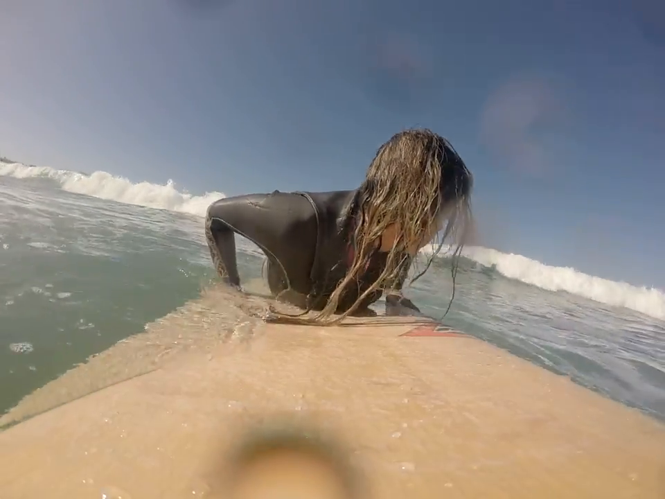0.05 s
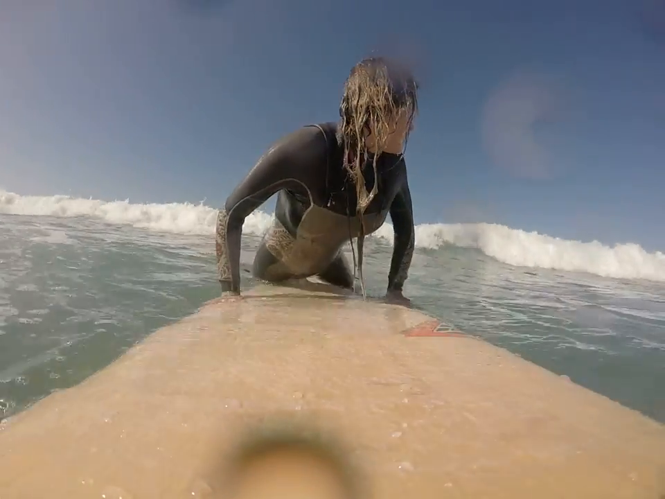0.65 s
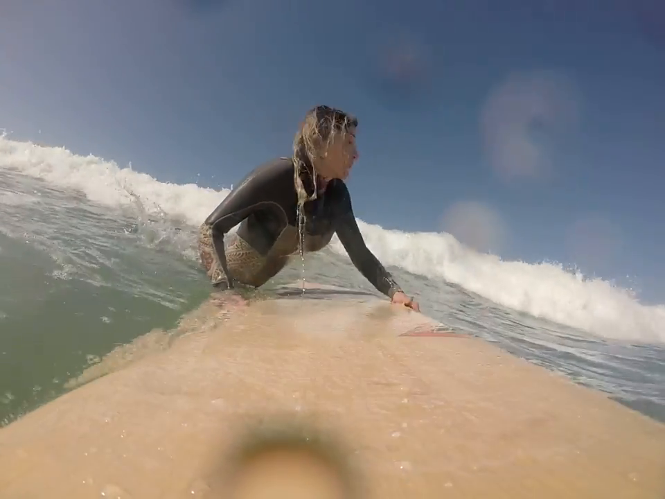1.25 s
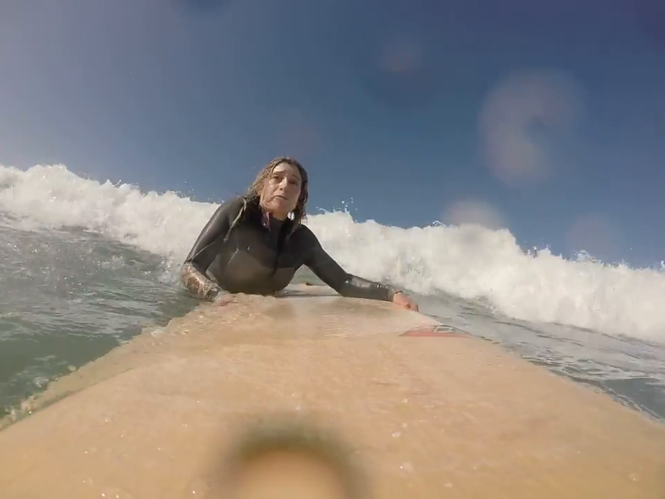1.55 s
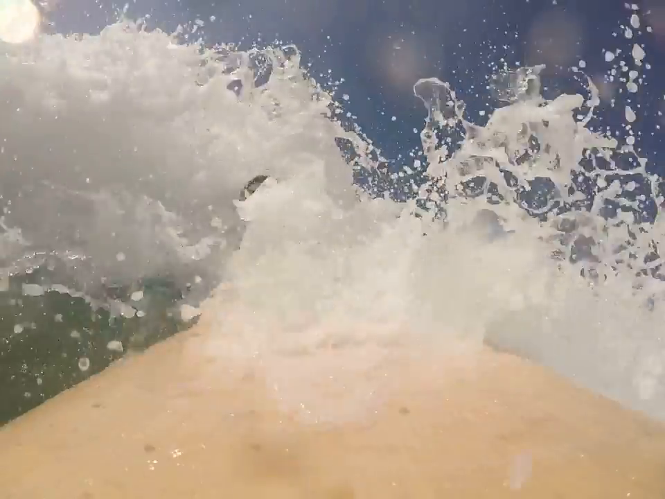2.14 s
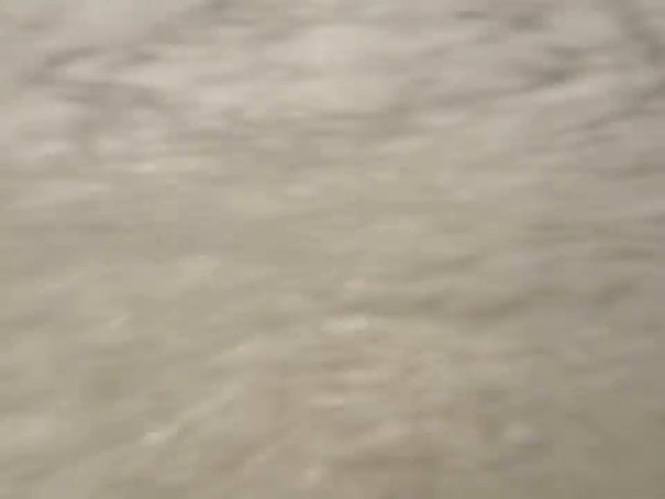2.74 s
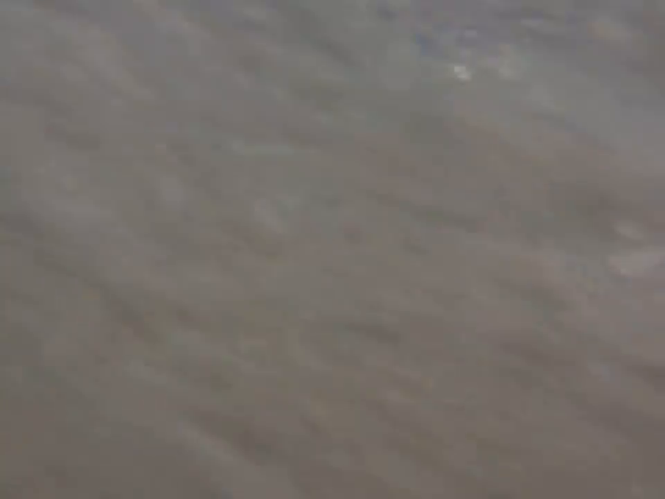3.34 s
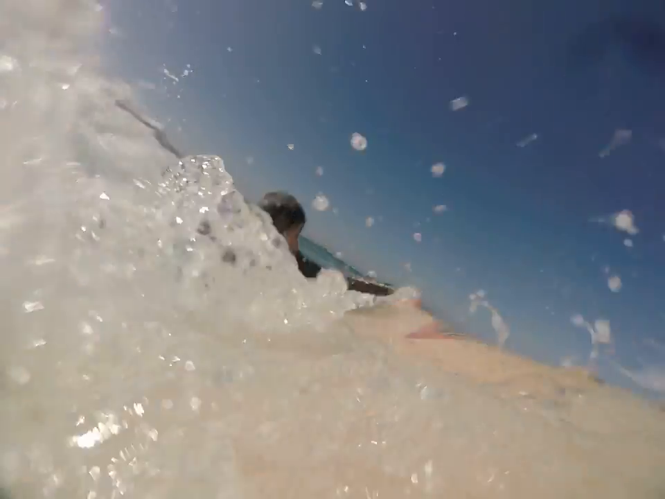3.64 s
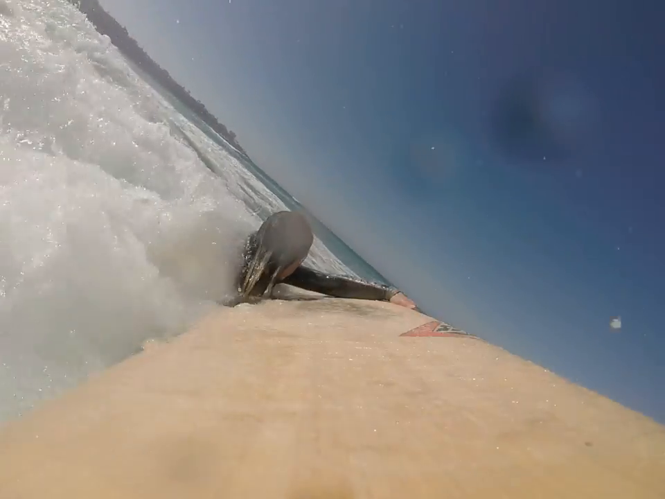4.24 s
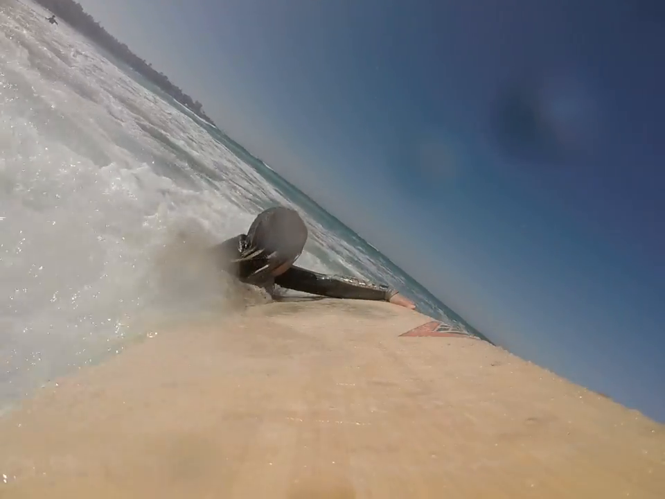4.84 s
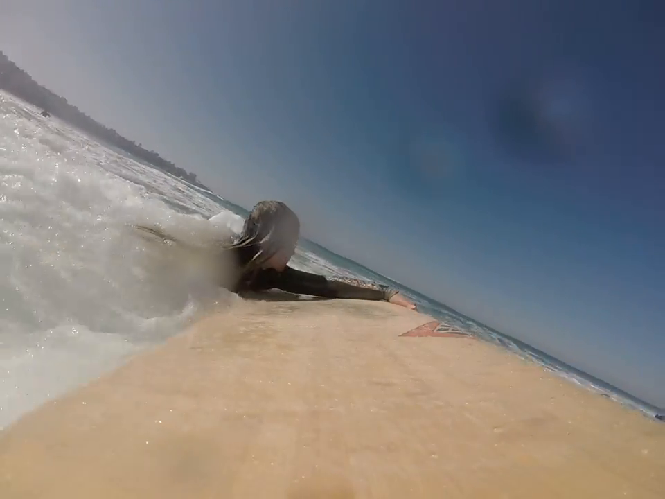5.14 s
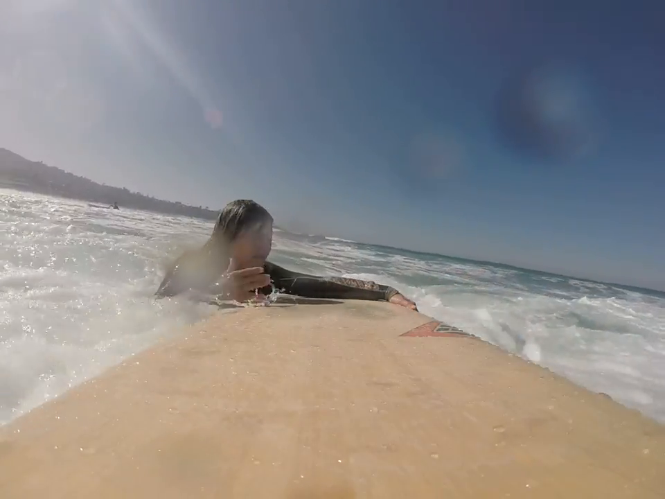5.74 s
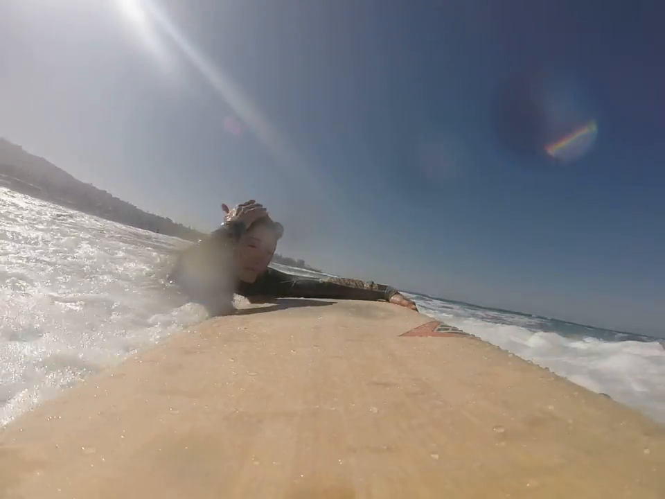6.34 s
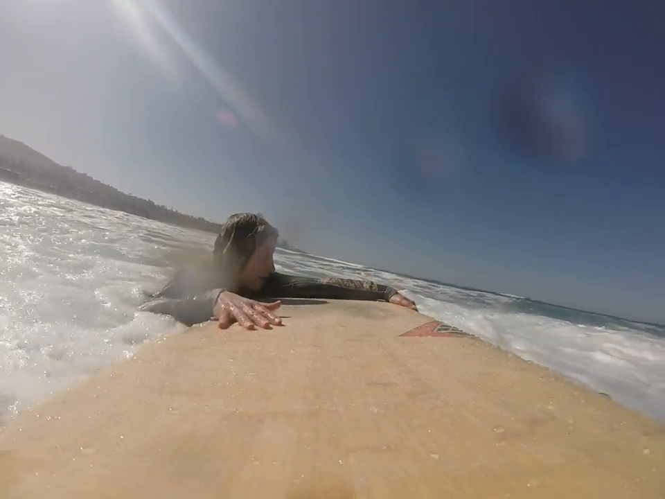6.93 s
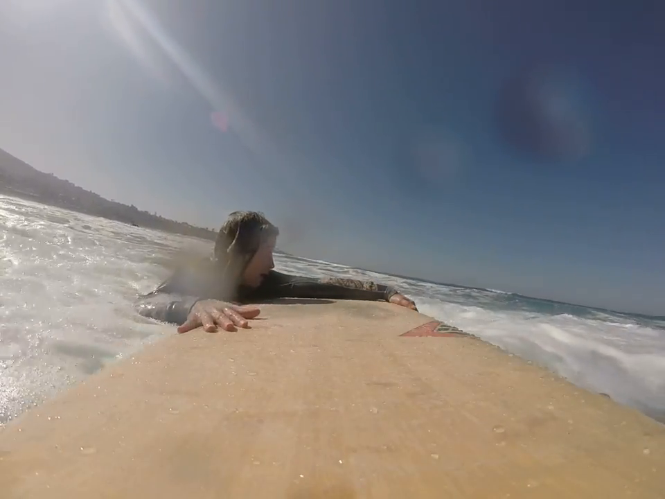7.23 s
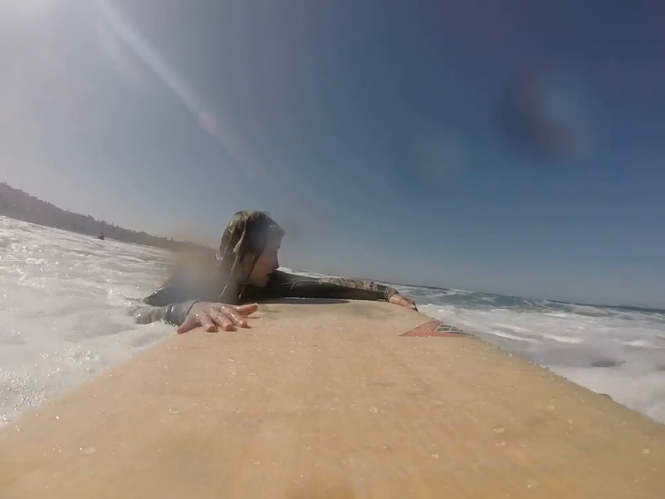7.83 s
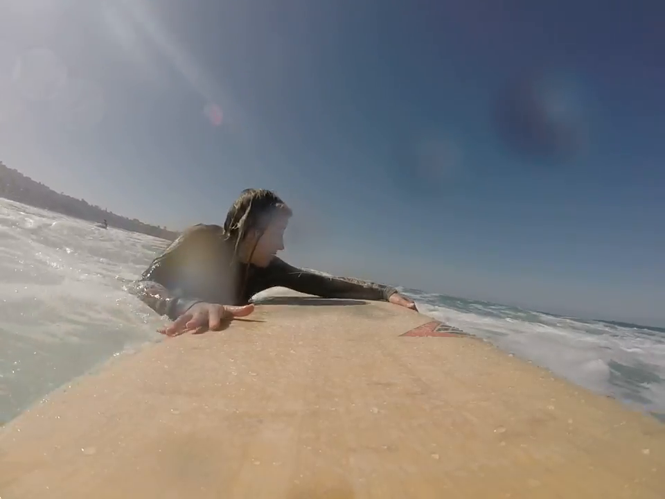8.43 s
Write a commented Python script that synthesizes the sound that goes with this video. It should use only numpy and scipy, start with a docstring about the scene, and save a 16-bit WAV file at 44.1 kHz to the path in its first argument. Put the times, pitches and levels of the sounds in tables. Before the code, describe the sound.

Surf roars in and buries a board in spray and low rumble, drains off with a glug, and leaves water slopping softly.

```python
"""A surfboard meets a breaking wave

Heard through a waterproof case on the board's nose, surf roars closer, whitewater buries the case
in ringing bubbles and drains away, then foam fizzes and slops around. The hollow board booms in its
bending mode under eddies and knocks. Slaps and drops ring the case, and wet hands squeak on the
deck by stick-slip friction."""
import sys
import numpy as np
from scipy import signal
from scipy.fft import rfft, irfft, next_fast_len
from scipy.io import wavfile

SR = 44100
rng = np.random.default_rng(int(sys.argv[2]) if len(sys.argv) > 2 else 0)


def dump_mix(stems):
    """Bounce the given channels to the path in sys.argv[1] as a 16-bit WAV at rate SR."""
    frames = np.atleast_2d(stems).T  # one column per channel
    limited = np.clip(frames, -1, 1)  # hard clip at full scale
    pcm = np.round(limited * 32767).astype(np.int16)
    wavfile.write(sys.argv[1], SR, pcm)


N = 378378
TIME = np.arange(N) / SR
WAVE_HITS_S, DRAINED_S = 2.329, 3.83


# Spectra of froth and of spray. Each row: frequency in Hz, relative density in dB.
FROTH_SPECTRUM = [(550, -12.5), (900, -9), (1400, 0), (2400, 2.5), (3200, -0.5), (4200, -5.5),
                  (5500, -13.5)]
SPRAY_SPECTRUM = [(3200, 9.5), (4200, -1.5), (5500, 3), (8500, -2), (11000, -7.5), (13500, -11.5),
                  (15300, -22)]
# The sheet of water breaks into drops. Each row: time in seconds, share of the full bubble rate.
WATER_COVER = [(2.33, 0.98), (2.85, 0.76), (3.05, 0.42), (3.25, 0.25), (3.42, .42), (3.7, 0.32)]

def whitewater(froth_db=-1.0, spray_db=0.5, rush_db=-9, mist_db=-13, clump_db=2.0):
    """Bubbles and spray on the case superpose into a rush, which parts into drops as their rate falls."""
    froth_gain, spray_gain = dousing()
    share, = in_time(WATER_COVER)
    froth = bubbles(FROTH_SPECTRUM, per_s=2400, cycles=15, spread_db=1.5, sizes=14, share=share)
    froth += from_db(rush_db) * noise(FROTH_SPECTRUM)
    spray = bubbles(SPRAY_SPECTRUM, per_s=4600, cycles=12, spread_db=2.5, sizes=14, share=share)
    spray += from_db(mist_db) * noise(SPRAY_SPECTRUM)
    spray *= np.interp(TIME, [3.62, 3.73], [1, 0])   # the spray stops as the case surfaces
    water = from_db(froth_db) * froth_gain * froth + from_db(spray_db) * spray_gain * spray
    return from_db(clump_db * drift(90)) * water


# Sheets of whitewater land on the case. Each row: start and length in seconds, relative levels of
# froth and of spray in dB.
WATER_SHEETS = [(2.323, 0.018, -14.5, -21.5), (2.397, 0.087, -17.5, -27), (2.563, 0.29, -18.5, -31.5),
                (2.875, 0.14, -23.5, -29), (3.018, 0.066, -27, -26), (3.105, 0.19, -36, -32),
                (3.341, 0.016, -22.5, -31), (3.401, 0.055, -21.5, -34), (3.487, .17, -27, -42.5)]

def dousing(attack_s=0.0085, run_off_db_per_s=167):
    """Gains of froth and spray: sheets pour, run off exponentially and, being incoherent, add in power."""
    froth, spray = 0, 0
    for start, length, froth_db, spray_db in WATER_SHEETS:
        landing = np.clip((TIME - start) / attack_s, 0, 1)
        pour = landing * from_db(-run_off_db_per_s * np.maximum(TIME - start - length, 0))
        froth = np.hypot(froth, from_db(froth_db) * pour)
        spray = np.hypot(spray, from_db(spray_db) * pour)
    return froth, spray


# Spectra of roar and of foam hiss. Each row: frequency in Hz, relative density in dB.
ROAR_SPECTRUM = [(500, -9.5), (880, -16.5), (1020, -11.5), (1150, -4), (1420, -1), (1800, -4.5), (2050, -2),
                 (2350, 3.5), (2650, -4.5), (3000, -5.5), (3500, -14.5), (4500, -25.5), (7000, -70)]
HISS_SPECTRUM = [(2500, -19), (3800, 4.5), (4600, -1.5), (5300, -1.5), (6400, -6.5), (7700, -7),
                 (9000, -14), (11000, -15), (13500, -19), (15500, -32)]
# The surf nears, breaks and settles. Each row: time in seconds, relative levels of roar and hiss in dB.
SURF_LEVELS = [(0.0, -35, -55), (0.9, -31.5, -53.5), (1.3, -29.5, -47.5), (1.76, -28, -44.5),
               (1.94, -17, -40.5), (2.3, -21, -42), (2.55, -31.5, -34), (3.65, -34.5, -54),
               (3.88, -45, -64), (4.3, -35.5, -52.5), (4.8, -34, -51), (5.4, -40, -53.5), (5.6, -37.5, -58),
               (6.35, -41.5, -57), (7.0, -37.5, -56.5), (7.4, -42, -59), (8.58, -40.5, -58)]

def surf(pops_db=-4.5, fizz_db=-9.0, slop_hiss_db=-22, surge_db=1.5):
    """Far bubbles sum to noise, near ones pop and fizz; the case wall transmits mostly 1-3 kHz."""
    roar_db, hiss_db = in_time(SURF_LEVELS)
    _, foam = slopping()
    in_foam = np.interp(TIME, [1.5, 4.0, 5.8, 7.0], [0.64, 1.3, 1.14, 0.32])   # arrives, then settles
    pops = from_db(pops_db) * bubbles(ROAR_SPECTRUM, per_s=550, cycles=15.6, spread_db=4.0, sizes=16)
    fizz = from_db(fizz_db) * bubbles(SPRAY_SPECTRUM, per_s=63, cycles=15, spread_db=3.5, sizes=7)
    roar = noise(ROAR_SPECTRUM) + in_foam * pops
    hiss = noise(HISS_SPECTRUM) + in_foam * fizz
    roar *= np.hypot(from_db(roar_db), foam)
    hiss *= np.hypot(from_db(hiss_db), from_db(slop_hiss_db) * foam)
    return (roar + hiss) * from_db(surge_db * drift(30))


# The water's steady push on the hull. Each row: time in seconds, relative level in dB.
HULL_PUSH = [(0.0, -43), (1.2, -41.5), (1.75, -41), (1.95, -20), (2.25, -20), (2.55, -29), (2.85, -29),
             (3.15, -33.5), (3.9, -39.5), (5.0, -38.5), (6.3, -42.5), (8.58, -44)]
# Spectra of sloshing, the flooded deck's filter, the buffeted board and large eddies.
# Each row: frequency in Hz, relative level in dB.
SLOSH_SPECTRUM = [(110, -7), (170, -3), (220, -1), (285, 0.5), (370, -2), (470, -5.5), (600, -12.5),
                  (850, -12.5), (1300, -3)]
FLOODED_RESPONSE = [(100, 2.5), (230, -0.5), (290, 2.5), (380, -9.5), (600, -8), (1300, -4.5)]
BUFFET_SPECTRUM = [(15, -15), (35, -11), (55, -8), (72, -2), (86, 7.5), (98, 2.5), (120, -16.5), (200, -38)]
CHURN_SPECTRUM = [(18, -1), (35, -5), (60, 3)]

def hull(slosh_db=-4.5, gurgle_db=-3.0, run_off_db=-23, lump_db=2.0, eddy_db=3.0):
    """Forced vibration: one flow rings air pockets at the rails and shakes the board's bending mode."""
    push = np.hypot(from_db(in_time(HULL_PUSH)[0]), slopping()[0])
    run_off = from_db(run_off_db) * swell(3.635, 0.15)   # the deck sheds its water in one gush
    slosh_gain = np.hypot(from_db(slosh_db) * push, run_off)
    pockets = bubbles(SLOSH_SPECTRUM, per_s=450, cycles=10.2, spread_db=4.0, sizes=11)
    water = unit_rms(noise(SLOSH_SPECTRUM) + from_db(gurgle_db) * pockets)
    flooded = np.interp(TIME, [2.6, 2.95, 3.6, 3.8], [0, 1, 1, 0])   # the deck sounds lower and hollower
    water = (1 - flooded) * water + flooded * colour(water, FLOODED_RESPONSE)
    churn_db = np.interp(TIME, [3.4, 3.8, 5.8, 6.1], [-4.5, -4.5, 1, -13])   # big eddies trail the wave
    shake = noise(BUFFET_SPECTRUM) + from_db(churn_db) * noise(CHURN_SPECTRUM)
    slosh = slosh_gain * from_db(lump_db * drift(25)) * water
    return slosh + push * from_db(eddy_db * drift(17)) * shake


# Small waves slop against the board. Each row: middle and length in seconds, relative levels of
# push and of foam in dB.
SMALL_WAVES = [(0.047, .14, -30.5, -33.5), (0.46, 0.13, -36.5, -40), (1.408, 0.18, -29, -51),
               (1.973, 0.083, -17.5, -33), (3.577, 0.31, -26.5, -33), (4.189, 0.16, -37.5, -34),
               (4.416, 0.24, -37.5, -41), (4.68, 0.4, -32.5, -42), (5.06, 0.17, -29.5, -29.5),
               (5.343, 0.18, -37.5, -36.5), (5.498, .12, -32.5, -60), (5.737, 0.18, -41.5, -40.5),
               (6.117, 0.18, -34.5, -41), (8.502, 0.13, -33, -34)]

def slopping():
    """Amplitude envelopes of the push on the hull and the stirred foam, as each wave swells and ebbs."""
    push, foam = 0, 0
    for middle, length, push_db, foam_db in SMALL_WAVES:
        shape = swell(middle, length)
        push += from_db(push_db) * shape
        foam += from_db(foam_db) * shape
    return push, foam


# Water and body strike the board. Each row: start in seconds, relative level of the boom in dB,
# thud in dB relative to the boom.
BOARD_BLOWS = [(0.057, -20, -6), (1.689, -19.5, 12.5), (1.719, -14, -5), (1.97, -4.5, -9),
               (2.218, -1.5, -18), (2.349, -6.5, -2), (2.482, -11.5, 2.5), (2.827, -10, -9),
               (3.588, -15, 2), (4.398, -17.5, -8), (5.067, -21, -9.5), (5.475, -22.5, -2),
               (6.763, -12, -13), (7.549, -21.5, -2), (7.864, -6, -3)]

def knocks(level_db=-3.0, push_s=0.005, boom_hz=87.7, thud_hz=200):
    """Free vibration: after a soft push the bending mode booms on, while a higher mode dies at once."""
    out, t = np.zeros(N), TIME[:SR // 2]
    push = np.diff(t ** 2 * np.exp(-2 * t / push_s), prepend=0)
    boom = unit_peak(ring(push, boom_hz, t60_s=0.31))
    thud = unit_peak(ring(np.diff(push, prepend=0), thud_hz, t60_s=0.02))
    for start, db, thud_db in BOARD_BLOWS:
        add(out, start, from_db(db + level_db) * (boom + from_db(thud_db) * thud))
    return out


# Hard slaps of water. Each row: start in seconds, peak in dB, pitch in Hz, spatter decay in seconds.
WATER_SLAPS = [(0.06, -14, 1240, 0.0035), (0.083, -13, 1320, .0026), (0.107, -10, 1440, 0.0031),
               (0.467, -15, 2200, 0.0039), (0.842, -13.5, 1800, .004), (1.321, -19, 316, .005),
               (1.324, -12.5, 1970, .0055), (1.556, -8, 2050, 0.0032), (1.671, -11, 2190, .004),
               (2.124, -5, 2190, 0.0019), (2.341, -10, 3360, 0.048), (2.486, 1, 3100, 0.0046),
               (2.709, -5.5, 2130, 0.0028), (2.759, -5, 3150, .0036), (2.813, -14, 700, 0.0036),
               (2.898, -3, 4150, 0.0028), (3.006, -9.5, 1505, .005), (3.040, 0.5, 2880, .0008),
               (3.330, 0.5, 2050, 0.0029), (3.363, -4, 4100, 0.0031), (3.400, -5, 2020, .004),
               (3.438, -10, 4960, .0025), (3.537, -3, 1980, 0.0019), (3.556, -9, 2290, .0027),
               (3.577, -5.5, 1500, 0.0022), (3.599, -3, 1430, 0.00092), (3.677, -9, 2150, 0.012),
               (3.736, -14, 1100, .002), (4.149, -24.5, 540, .003), (4.686, -18.5, 1520, 0.0079),
               (4.860, -14.5, 2300, .0025), (5.065, -18, 435, 0.0066), (5.066, -8.5, 1380, .004),
               (5.243, -18, 1500, 0.0046), (5.453, -26, 620, 0.0054), (5.466, -24, 346, .008),
               (5.629, -29, 2220, .002), (5.754, -16, 2320, 0.0061), (6.068, -20.5, 1370, 0.0017),
               (6.212, -19, 1980, 0.0029), (6.889, -25.5, 1320, .017), (7.863, -23, 340, 0.0033),
               (7.995, -19.5, 1390, .004)]

def slaps():
    """Impact excitation with much spatter makes each slap broad and wet."""
    out = np.zeros(N)
    for start, db, hz, spatter_s in WATER_SLAPS:
        add(out, start, splat(db, hz, cycles=10.7, spatter=0.22, spatter_s=spatter_s))
    return out


# Single drops on the case. Each row: start in seconds, peak in dB, pitch in Hz.
CASE_DROPS = [(0.245, -25.5, 4200), (0.981, -21.5, 3350), (3.136, -6.5, 7700), (3.152, -14, 9400),
              (3.248, -15.5, 4270), (3.682, -12.5, 5160), (3.887, -30.5, 7050), (3.958, -27.5, 6040),
              (4.939, -23, 3300), (5.174, -23, 6000), (5.201, -25, 3670), (5.446, -29, 9700),
              (5.884, -26, 4550), (6.522, -29, 3380), (7.703, -34, 7840), (8.342, -31.5, 4000)]

def drops():
    """A drop is nearly an ideal impulse, so it ticks cleanly."""
    out = np.zeros(N)
    for start, db, hz in CASE_DROPS:
        add(out, start, splat(db, hz, cycles=15, spatter=0.075, spatter_s=0.002))
    return out


def splashes(count=36, above_water_db=9.0, spread_db=2.0, middle_hz=1750, octaves=0.38, calm_s=6.3):
    """Small random impacts follow the wave, their amplitude proportional to the water's around them."""
    out = np.zeros(N)
    water = np.hypot(from_db(in_time(SURF_LEVELS)[0]), dousing()[0])
    for start in rng.uniform(WAVE_HITS_S, calm_s, count):
        strength, pitch = np.clip(rng.standard_normal(2), -2, 2)
        db, hz = above_water_db + spread_db * strength, middle_hz * 2 ** (octaves * pitch)
        pop = splat(db, hz, cycles=15, spatter=0.092, spatter_s=0.005)
        add(out, start, np.interp(start, TIME, water) * pop)
    return out


# Water drains off the case. Each row: time in seconds, level in dB, typical starting pitch in Hz.
DRAIN_COURSE = [(3.478, -38, 232), (3.55, -35, 222), (3.611, -32.5, 262), (3.66, -30, 412),
                (3.701, -25.5, 614), (3.74, -34.5, 834), (3.786, -32, 980), (3.83, -73, 1160)]

def drain(per_s=120, cycles=13, scatter=0.23, rise=0.22, spread_db=0.5):
    """Air pockets glug as water runs off; they shrink, so their resonant frequency climbs."""
    times, levels_db, pitches_hz = np.transpose(DRAIN_COURSE)
    out = np.zeros(N)
    for k in range(int((times[-1] - times[0]) * per_s)):
        late, detune, strength = rng.standard_normal(3)
        born = times[0] + (k + late / 2) / per_s
        hz = np.interp(born, times, pitches_hz) * np.exp(scatter * detune)
        age = TIME[:int(SR * cycles / hz)] * hz / cycles   # 0 to 1 over the glug's life
        envelope = from_db(-60 * age) * (1 - np.exp(-2 * cycles * age))
        glug = envelope * np.sin(2 * np.pi * cycles * age * (1 + rise * age))
        glug *= np.sqrt(SR / per_s / np.sum(glug ** 2))   # a stream of these has unit power
        add(out, born, from_db(np.interp(born, times, levels_db) + spread_db * strength) * glug)
    return out


# Wet skin rubs the deck. Each row: start and length in seconds, level in dB, first and last pitch
# in Hz, overtones in dB relative to the fundamental, roughness as a fraction of the pitch.
SKIN_RUBS = [(0.896, 0.032, -10.5, 527, 479, -13, 0.03), (1.569, 0.053, -25.5, 462, 438, -31, 0.06),
             (1.66, 0.063, -27, 557, 510, -4, 0.12), (1.838, 0.022, -18, 476, 476, -15, 0.05),
             (6.58, 0.1, -29.5, 2285, 2004, -28, 0.07), (6.698, 0.11, -35, 2110, 2045, -21, 0.08),
             (8.432, 0.047, -37, 892, 913, 12, 0.02), (8.453, 0.042, -25, 1000, 1007, -2.5, 0),
             (8.478, 0.033, -20.5, 1620, 1735, -19, 0.06), (8.502, 0.014, -25.5, 1006, 1140, -3, 0.09)]

def squeaks(third_db=-12, slip_s=0.0019, chatter=3.0):
    """Stick-slip friction gives three harmonics; uneven grip modulates their pitch and strength."""
    out = np.zeros(N)
    for start, length, db, first_hz, last_hz, overtone_db, roughness in SKIN_RUBS:
        t = TIME[:int(length * SR)]
        wobble = roughness * random_curve(t / slip_s)
        grip = roughness * random_curve(t / slip_s)
        hz = np.linspace(first_hz, last_hz, len(t)) * (1 + wobble)
        phase = 2 * np.pi * np.cumsum(hz) / SR
        overtones = np.sin(2 * phase) + from_db(third_db) * np.sin(3 * phase)
        tone = np.sin(phase) + from_db(overtone_db) * overtones
        envelope = np.interp(t / length, [0, .12, .5, 1], [0, 1, 1, 0])
        add(out, start, from_db(db) * tone * (1 + chatter * grip) * envelope)
    return out


# Spectra of the wave's low roar and of lapping. Each row: frequency in Hz, relative density in dB.
BASS_SPECTRUM = [(71, -33), (120, -2), (263, -3), (322, -4), (350, -5.5), (458, -2.5), (547, -8.5),
                 (900, -10.5), (1170, -47), (1980, -120)]
LAPPING_SPECTRUM = [(71, -44), (120, -14), (242, -7), (267, -8.5), (368, 1), (404, -8), (547, -10.5),
                    (900, -12.5), (1170, -48), (1980, -120)]

def open_water(bass_db=-12.5, lapping_db=-45.5, settle_db_per_s=1.36, ripple_db=1.5):
    """The oncoming wave's low roar gives way to foam lapping at the rails, in exponential decay."""
    passed = np.clip(TIME - WAVE_HITS_S, 0, 1)
    bass = from_db(in_time(SURF_LEVELS)[0] + bass_db) * noise(BASS_SPECTRUM)
    lapping = from_db(lapping_db - settle_db_per_s * (TIME - DRAINED_S)) * noise(LAPPING_SPECTRUM)
    return ((1 - passed) * bass + passed * lapping) * from_db(ripple_db * drift(20))


def dry_case(hz=5200, width_hz=260, level_db=-24):
    """Until it is drenched, the case has a narrow resonance that the surf's noise excites."""
    tone = unit_rms(ring(rng.standard_normal(N), hz, t60_s=np.log(1000) / (np.pi * width_hz)))
    return from_db(in_time(SURF_LEVELS)[0] + level_db) * tone * (TIME < WAVE_HITS_S)


def drips(count=22, level_db=-36, spread_db=3.5, low_hz=3300, high_hz=9000):
    """Faint impacts at random times keep the drained case ticking."""
    out = np.zeros(N)
    for start in rng.uniform(DRAINED_S, TIME[-1], count):
        hz = low_hz * (high_hz / low_hz) ** rng.random()
        db = level_db + rng.uniform(-spread_db, spread_db)
        add(out, start, splat(db, hz, cycles=13, spatter=0.13, spatter_s=0.0022))
    return out


def bubbles(spectrum, per_s, cycles, spread_db, sizes, share=1):
    """Bubbles are damped oscillators born at random; share thins them at constant power; rms 1."""
    out, share = np.zeros(N), share * np.ones(N)
    count = int(per_s * N / SR / sizes)
    for hz in np.geomspace(spectrum[0][0], spectrum[-1][0], sizes):
        born = rng.integers(N, size=count)
        strength = from_db(spread_db * np.minimum(rng.exponential(size=count), 4))
        sign = rng.choice([-1, 1], count)
        present = rng.random(count) < share[born]
        births = np.bincount(born, sign * strength * present / np.sqrt(share[born]), N)
        onset = ring(births, hz, cycles / hz / 4)   # a bubble takes a cycle or so to get going
        out += np.sqrt(hz) * unit_rms(ring(np.diff(onset, prepend=0), hz, cycles / hz))
    return colour(out, spectrum)


def splat(db, hz, cycles, spatter, spatter_s):
    """An impulse and its spatter ring a heavily damped cavity; the water rounds the click."""
    t = TIME[:SR // 16]
    push = (t == 0) + spatter * rng.standard_normal(len(t)) * np.exp(-t / spatter_s)
    pop = ring(np.diff(push, prepend=0), hz, cycles / hz)
    rounding = signal.butter(3, [hz / 4, hz * 1.5], "band", fs=SR, output="sos")
    return from_db(db) * unit_peak(signal.sosfilt(rounding, pop))


def ring(push, hz, t60_s):
    """A damped resonator: an impulse starts a sine that falls 60 dB in t60_s."""
    decay, step = from_db(-60 / (t60_s * SR)), 2 * np.pi * hz / SR
    return signal.lfilter([0, np.sin(step)], [1, -2 * decay * np.cos(step), decay ** 2], push + 1e-18)


def colour(x, spectrum):
    """Filter to a spectrum that falls 20 dB per octave beyond its ends; rms 1."""
    size = next_fast_len(N)
    hz, db = np.transpose(spectrum)
    knots, octave = np.log2(hz), np.log2(np.maximum(np.fft.rfftfreq(size, 1 / SR), 1))
    beyond = abs(octave - np.clip(octave, knots[0], knots[-1]))
    gain = from_db(np.interp(octave, knots, db) - 20 * beyond)
    return unit_rms(irfft(rfft(x, size) * gain, size)[:N])


def noise(spectrum):
    """Gaussian noise with the given spectrum; rms 1."""
    return colour(rng.standard_normal(N), spectrum)


def random_curve(position):
    """Linear interpolation between Gaussian values, one at each whole position."""
    count = int(position[-1]) + 2
    return np.interp(position, np.arange(count), rng.standard_normal(count))


def drift(per_s):
    """Random modulation with per_s new values a second; rms 1."""
    return unit_rms(random_curve(TIME * per_s))


def swell(middle_s, length_s):
    """A Gaussian bell of height 1."""
    return np.exp(-np.minimum((2 * (TIME - middle_s) / length_s) ** 2, 20))


def in_time(rows):
    """Interpolate a table's columns at every sample."""
    times, *columns = np.transpose(rows)
    return [np.interp(TIME, times, column) for column in columns]


def from_db(db):
    """Decibels to amplitude."""
    return 10 ** (np.asarray(db) / 20)


def unit_rms(x):
    """Scale to unit power."""
    return x / np.sqrt(np.mean(x ** 2) + 1e-20)


def unit_peak(x):
    """Scale to a peak of 1."""
    return x / abs(x).max()


def add(out, start_s, sound):
    """Superpose a short sound on out."""
    i = int(start_s * SR)
    out[i:i + len(sound)] += sound[:N - i]


def scene():
    """Superposition: all sources reach one microphone through board and case."""
    water = whitewater() + surf() + hull()
    impacts = knocks() + slaps() + drops() + splashes()
    return (water + impacts + drain() + squeaks() + open_water() + dry_case() + drips())[None]


def record(dry):
    """The hardest peaks overload and clip; a steep low-pass removes the highest treble."""
    low_pass = signal.ellip(10, .1, 90, 15400, fs=SR, output="sos")
    return signal.sosfilt(low_pass, np.clip(dry, -.9, .9))


dry = scene()
out = record(dry)
dump_mix(out)
```